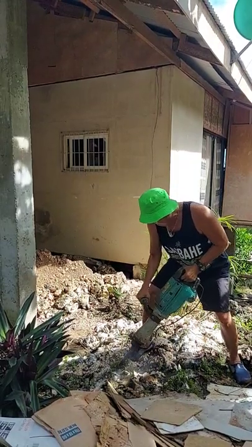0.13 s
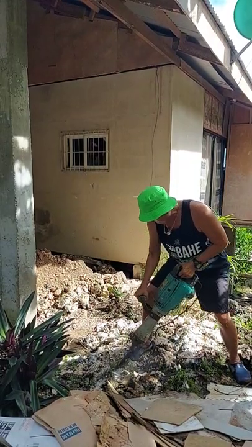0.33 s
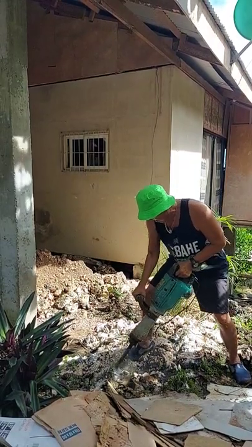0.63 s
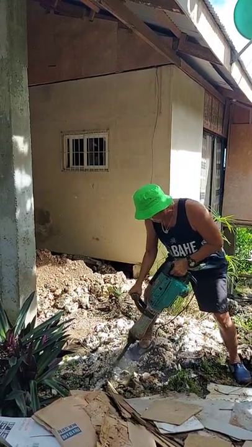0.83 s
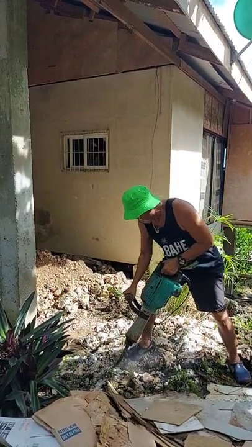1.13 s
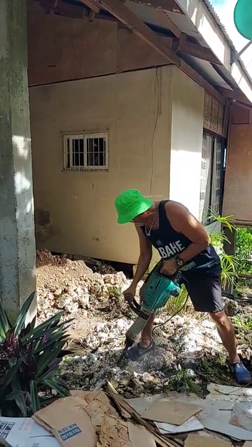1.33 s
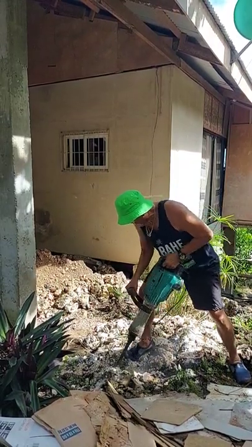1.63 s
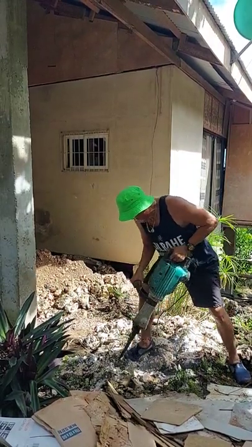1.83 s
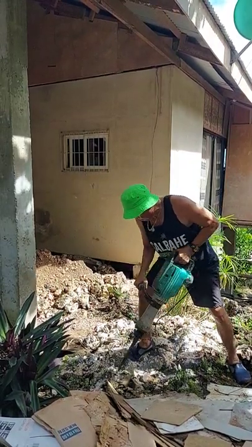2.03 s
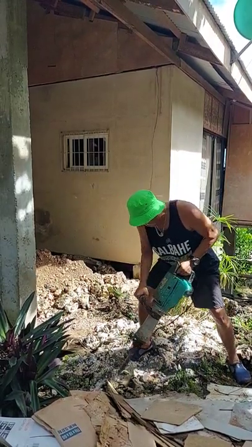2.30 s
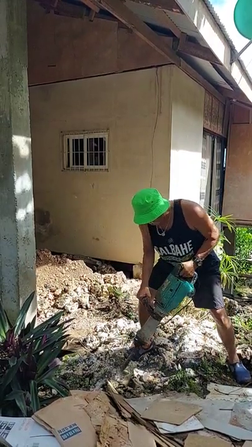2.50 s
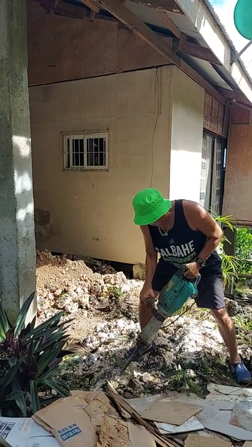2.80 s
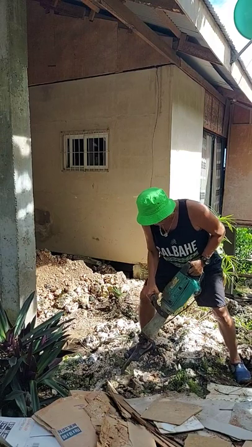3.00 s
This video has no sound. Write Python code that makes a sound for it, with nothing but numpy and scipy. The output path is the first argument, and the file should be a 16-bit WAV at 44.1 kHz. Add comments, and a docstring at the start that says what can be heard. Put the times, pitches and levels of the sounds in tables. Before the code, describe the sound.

Demolition hammer chipping stone outdoors, fast ringing clatter that dulls, bites again, and winds down.

```python
"""An electric demolition hammer chips rocky ground beside a house wall, about 17 blows a second.
First the motor whirrs, as coloured noise with a hum, and the loose chisel knocks in its holder.
Then each blow cracks on the rock (noise bursts), rings the steel chisel (decaying modes), thuds into
the soil (a sine of sagging pitch) and booms in the housing, while the house wall sends back echoes.
The blows soften as the chisel sinks in, bite again, then slow and stop; the motor runs down to a dull bump."""
import sys
import numpy as np
from scipy import signal
from scipy.io import wavfile

SR = 44100
rng = np.random.default_rng(int(sys.argv[2]) if len(sys.argv) > 2 else 0)


def master(y):
    """Save y as 16-bit WAV."""
    cut = np.clip(np.atleast_2d(y).T, -1, 1)
    pcm = np.round(cut * 32767)  # scale
    wavfile.write(sys.argv[1], SR, pcm.astype(np.int16))


N = 138915
T = np.arange(N) / SR  # time [s]


def amp(db):
    """Level to amplitude ratio: 20 dB is a factor of ten."""
    return 10 ** (np.asarray(db) / 20)


def evened(x):
    """Normalisation to unit root-mean-square amplitude."""
    return x / np.sqrt(np.mean(x ** 2) + 1e-20)


def add(mix, s, sound):
    """Linear superposition: adds a sound into the mix, in place, from time s [s]."""
    part = mix[max(round(s * SR), 0):][:len(sound)]
    part += sound[:len(part)]


def drift(rate_hz):
    """Slow random modulation of unit rms: straight lines between random knots, two per 1 / rate_hz."""
    knots = rng.standard_normal(SR // 2)
    return evened(np.interp(T * rate_hz * 2, np.arange(len(knots)), knots))


def grit(grain):
    """Amplitude-modulated white noise: its power clumps into sub-millisecond grains."""
    clumps = np.exp(grain * np.clip(drift(1200), -2, 2))
    return evened(rng.standard_normal(N) * clumps)


def colour(x, points, size=4096):
    """Minimum-phase filtering: the Hilbert transform of the log gain gives the causal phase; unit power."""
    hz, db = np.transpose(points)
    log_hz = np.log(abs(np.fft.fftfreq(size, 1 / SR)) + 1)
    log_gain = np.log(amp(np.interp(log_hz, np.log(hz), db)))
    response = np.exp(np.conj(signal.hilbert(log_gain)))
    taps = np.fft.ifft(response).real[:size // 2]
    return signal.oaconvolve(x, taps / np.linalg.norm(taps))[:N]


def bursts(times, levels_db, rise, hold, decay):
    """Incoherent addition: envelopes of linear attack, hold and exponential release sum in power."""
    t, power = T[:SR // 10], np.zeros(N)
    shape = np.minimum(t / rise, 1) * np.exp(-np.maximum(t - hold, 0) / decay)
    for s, db in zip(times, levels_db):
        add(power, s, (amp(db) * shape) ** 2)
    return np.sqrt(power)


# how tightly the rock wedges the chisel: (time [s], grip [0-1])
WEDGED = [(0, 0.74), (.45, 0.1), (.85, 0.31), (1.1, 0.37), (1.3, 0.52), (1.68, 0.95), (1.8, .55), (2.3, .4),
          (2.5, 0.4), (2.72, 0.02)]


def wedged(s):
    """Boundary condition of the chisel: grip of the rock at time s, from free (0) to clamped (1)."""
    return np.clip(np.interp(s, *np.transpose(WEDGED)), 0, 1)


def gripped(x, free, tight):
    """Crossfade between the spectra of a free and a clamped body, weighted by the grip."""
    grip = wedged(T)
    return colour(x * (1 - grip), free) + colour(x * grip, tight)


# blows on the rock, levels relative within each part: (time [s], crack level [dB], thud level [dB],
# stone crunch level [dB], chisel ring level [dB], highest modes level [dB], thud reference pitch [Hz])
BLOWS = [(0.2235, -3, -33, -21.5, -11, -24.5, 267), (0.2802, -5, -38, -27, -14, -28, 116),
         (0.3414, -0.5, -24, -20.5, -15, -25, 300), (0.402, -3.5, -20, -26, -12.5, -23, 115),
         (0.4597, -3, -40, -16.5, -20.5, -27, 300), (0.5171, -6, -26, -29.5, -19.5, -28, 70.0),
         (0.5788, -3, -27.5, -24.5, -16, -22, 132), (0.6378, -1, -31, -20, -15, -25.5, 108),
         (0.6968, -5, -23, -23.5, -15, -25, 307), (0.7552, -3.5, -48, -25.5, -15.5, -36, 116),
         (0.816, -5, -22, -19.5, -14, -25.5, 73), (0.8752, -6, -31.5, -22, -13, -25, 101),
         (0.9347, -1.5, -48, -27.5, -14.5, -34, 124), (0.995, -5.5, -58, -24.5, -15.5, -28, 96.9),
         (1.0555, -2, -51, -30.5, -20, -33, 121), (1.1109, -4.5, -51, -35, -22, -28, 121),
         (1.1704, -5, -42, -27, -25, -32, 118), (1.2283, -5.5, -29, -22.5, -15, -26, 132),
         (1.287, -11.5, -39, -28.5, -20, -25, 116), (1.3489, -6.5, -46, -33, -25.5, -26.5, 125),
         (1.4092, -7, -38, -44, -22, -30, 116), (1.4688, -8.5, -37, -30, -20, -30, 131),
         (1.5305, -10, -43, -26, -18.5, -27.5, 114), (1.5882, -8, -37.5, -31, -20.5, -32, 105),
         (1.6492, -13, -42, -34, -38, -44, 124), (1.698, -10, -40.5, -27.5, -52, -42, 300),
         (1.7687, -16, -38, -35, -36, -40, 320), (1.8284, -13, -43, -33, -34, -42, 302),
         (1.8886, -16, -44, -33, -45, -49, 318), (1.949, -18, -44, -30.5, -43, -42, 299),
         (2.0095, -14, -39.5, -33, -31, -39, 336), (2.0705, -18, -38.5, -32, -31, -38, 320),
         (2.1304, -22, -59, -30, -43, -37, 75.4), (2.1911, -14, -47, -26.5, -27, -29.5, 80.7),
         (2.2506, -14.5, -35, -27.5, -37, -30, 350), (2.37, -6.5, -24.5, -20, -17.5, -25.5, 70.5),
         (2.4281, -4.5, -27, -20.5, -16, -21, 237), (2.486, -5, -26.5, -20, -16.5, -22.5, 137),
         (2.5561, -3.5, -32, -20.5, -15.5, -24, 266), (2.6345, -2.5, -42, -22, -20, -24.5, 295),
         (2.7308, -7.5, -40, -27.5, -14, -24, 59.2), (2.8417, -8, -32, -28.5, -15, -25.5, 64.6)]
# spectra of the crack, chisel free and wedged: (frequency [Hz], relative density [dB])
CRACK_FREE = [(100, -30), (1200, -34), (2400, 1), (3200, 0), (4500, 1), (5400, 6), (6500, -8), (8200, 3.5),
              (9400, -12.5), (10600, -14.5), (12000, 1.5), (14000, -6.5), (16000, -3.5)]
CRACK_WEDGED = [(100, -49), (1200, -4.5), (2400, 2), (3150, 9.5), (3650, 0), (4200, 5), (5400, -2),
                (6800, -1.5), (8200, 4), (9400, -18), (10600, -11), (12400, -15.5), (14000, -8),
                (16000, -11)]
# spectrum of the stone crunch: (frequency [Hz], relative density [dB])
CRUNCH = [(100, -21), (350, -6.5), (620, 1), (920, -3), (1300, 0.5), (1750, 1), (2300, -7), (4000, -19.5),
          (16000, -60)]
CRACK_OFFSET_DB, CRACK_HOLD_S, CRACK_DECAY_S, CRACK_GRAIN = -8.5, 0.0017, 0.0017, 0.17
CRUNCH_OFFSET_DB, CRUNCH_HOLD_S, CRUNCH_DECAY_S = 1.5, 0.002, 0.0023


def rock():
    """Impact and fracture: a short broadband force on stone gives a sharp crack and a duller crunch."""
    s, crack_db, _, crunch_db, *_ = np.transpose(BLOWS)
    crack_level = bursts(s, crack_db + CRACK_OFFSET_DB, 0.00033, CRACK_HOLD_S, CRACK_DECAY_S)
    crunch_level = bursts(s, crunch_db + CRUNCH_OFFSET_DB, 0.00076, CRUNCH_HOLD_S, CRUNCH_DECAY_S)
    crack = gripped(grit(CRACK_GRAIN) * crack_level, CRACK_FREE, CRACK_WEDGED)
    return crack + colour(grit(0.27) * crunch_level, CRUNCH)


# the loose chisel knocks in its holder: (time [s], knock level [dB], ring level [dB])
KNOCKS = [(.023, -30, -52), (.046, -28.5, -50), (.080, -32, -51), (.106, -28.5, -48), (.142, -32.5, -53),
          (.255, -28, -20), (.303, -35, -25), (.381, -32, -20), (.414, -28, -18), (.609, -36, -20.5),
          (1.709, -25.5, -43), (2.405, -31, -23), (2.442, -31, -18.5), (2.456, -42, -23), (2.517, -36, -19),
          (2.586, -40, -23.5), (2.61, -34, -23.5), (2.749, -33, -36), (2.864, -28, -22.5),
          (3.016, -40, -66), (3.063, -39.5, -68)]


def strikes():
    """Impulsive excitation of the chisel by blows and knocks: (time [s], ring [dB], highest modes [dB])."""
    blows = [(s, ring_db, high_db) for s, _, _, _, ring_db, high_db, _ in BLOWS]
    knocks = [(s, ring_db, ring_db - 13) for s, _, ring_db in KNOCKS]
    return blows + knocks


# modes of the chisel: (frequency [Hz], relative level when free [dB], 60 dB decay time [s],
# level change when fully wedged [dB])
CHISEL = [(5314, -7, 0.088, -19), (5457, -11.5, 0.24, -27), (7845, -10.5, 0.51, 0), (7870, -13, .12, 4),
          (8030, -10, 0.15, -6), (8570, -17, 0.14, -8), (8255, -6, 0.26, -11), (11570, -0.5, 0.066, 2),
          (11440, 2, 0.11, -9.5), (12630, -11, 0.36, 8), (13600, -17, .14, 2), (14928, -14, .18, -4),
          (15600, -17, .2, -6)]
HIGH_MODES_HZ = 10000  # modes above this follow the level of the highest modes
RING_SPREAD_DB = 0.5  # random spread of each mode at each strike
RING_RATTLE, RING_JITTER_HZ = 0.35, 18.05  # rms depth of level and of frequency modulation


def ring():
    """Modal synthesis: struck resonators rebalanced by chance and grip, and rattled by the holder."""
    s, ring_db, high_db = np.transpose(strikes())
    at, out = np.round(s * SR).astype(int), np.zeros(N, complex)
    chance = rng.standard_normal((len(s), len(CHISEL), 2))
    for k, (hz, db, t60, wedge_db) in enumerate(CHISEL):
        spread, turns = chance[:, k].T
        strike_db = high_db if hz > HIGH_MODES_HZ else ring_db
        level_db = strike_db + db + wedge_db * wedged(s) + RING_SPREAD_DB * spread
        kicks = np.zeros(N, complex)
        kicks[at] = amp(level_db) * np.exp(2j * np.pi * turns)
        # one complex pole turns at the modal frequency and decays by 60 dB in t60
        pole = np.exp((2j * np.pi * hz - np.log(1000) / t60) / SR)
        out += signal.lfilter([1], [1, -pole], kicks)
    jitter = np.exp(2j * np.pi * np.cumsum(RING_JITTER_HZ * drift(90)) / SR)
    return (out * jitter).real * (1 + RING_RATTLE * drift(160))


# spectra of the clang, chisel free and wedged: (frequency [Hz], relative density [dB])
CLANG_FREE = [(1000, -59), (4800, -14.5), (5400, -4.5), (6000, -21), (7300, -31), (7850, 6), (8150, 7.5),
              (8600, -6), (9300, -34), (16000, -36)]
CLANG_WEDGED = [(1000, -18), (2700, -30.5), (3150, -6), (3600, -24), (6700, -10.5), (7400, -5), (8000, 6),
                (8500, -2.5), (9300, -21), (16000, -52)]
# spectra of the shimmer, chisel free and wedged: (frequency [Hz], relative density [dB])
SHIMMER_FREE = [(9500, -50), (11000, -4), (11500, 4), (12000, -17), (12550, -20), (13900, -12), (15200, -1)]
SHIMMER_WEDGED = [(9500, -25), (11000, -33), (12000, -8), (12500, 11), (12900, 2), (13300, -16), (15200, 2)]
CLANG_OFFSET_DB, CLANG_HOLD_S, CLANG_DECAY_S = -3, 0.0013, 0.012
SHIMMER_OFFSET_DB, SHIMMER_WEDGED_DB, SHIMMER_DECAY_S = -2, 9, 0.012  # second: added at full grip


def clang():
    """High modal density: short-lived modes of chisel and holder merge into noise, with a shimmer on top."""
    s, ring_db, high_db = np.transpose(strikes())
    clang_level = bursts(s, ring_db + CLANG_OFFSET_DB, 0.00067, CLANG_HOLD_S, CLANG_DECAY_S)
    shimmer_db = high_db + SHIMMER_OFFSET_DB + SHIMMER_WEDGED_DB * wedged(s)
    shimmer_level = bursts(s, shimmer_db, 0.0005, CLANG_HOLD_S, SHIMMER_DECAY_S)
    main = gripped(grit(0.062) * clang_level, CLANG_FREE, CLANG_WEDGED)
    return main + gripped(grit(0.11) * shimmer_level, SHIMMER_FREE, SHIMMER_WEDGED)


# spectrum of the soil rumble: (frequency [Hz], relative density [dB])
SOIL = [(20, -19), (45, 2), (80, -7), (135, -4), (210, 0.5), (310, 0.5), (450, -1.5), (600, -19),
        (900, -61), (4000, -67)]
SOIL_OFFSET_DB, SOIL_RISE_S, SOIL_DECAY_S = 4.5, 0.0017, 0.0066
THUD_OFFSET_DB, THUD_RISE_S, THUD_DECAY_S = 8, 0.0019, 0.016
THUD_START, THUD_END, THUD_SAG_S = 1.29, 0.455, 0.0084  # pitch ratios to the reference; time constant


def ground():
    """Damped oscillation: each push on the soil gives a few cycles of sagging pitch and a short rumble."""
    t, thuds = T[:SR // 10], np.zeros(N)
    sag = THUD_END + (THUD_START - THUD_END) * np.exp(-t / THUD_SAG_S)
    u = t / THUD_RISE_S
    shape = 2 * u / (1 + u ** 2) * np.exp(-t / THUD_DECAY_S)
    for s, _, db, *_, hz in BLOWS:
        wave = np.sin(2 * np.pi * np.cumsum(hz * sag) / SR)
        add(thuds, s, amp(db + THUD_OFFSET_DB) * shape * wave)
    s, _, thud_db, *_ = np.transpose(BLOWS)
    rumble_level = bursts(s, thud_db + SOIL_OFFSET_DB, SOIL_RISE_S, SOIL_RISE_S, SOIL_DECAY_S)
    return thuds + colour(grit(0.17) * rumble_level, SOIL)


# modes of the tool body: (mean frequency [Hz], relative level [dB], 60 dB decay time [s])
HOUSING = [(84, -40, 0.11), (131.5, -32.5, 0.069), (300, -43, 0.11), (607.3, -36, .08),
           (1692, -37.5, 0.048)]
RECOIL_RISE_S, RECOIL_FULL_DB = 0.0083, -6.5  # weaker cracks than this shake the housing less


def housing():
    """Recoil by reaction: every blow sets off brief body modes, slightly detuned by chance."""
    hz, db, t60 = np.transpose(HOUSING)[:, :, None]
    t, out = T[:SR // 8], np.zeros(N)
    fade = amp(db - 60 * t / t60) * np.minimum(t / RECOIL_RISE_S, 1)
    for s, crack_db, *_ in BLOWS:
        detune, phase = rng.standard_normal((2, len(hz), 1))
        waves = np.sin(2 * np.pi * (hz * (1 + 0.034 * detune) * t + phase))
        recoil_db = 7 + min(crack_db - RECOIL_FULL_DB, 0)
        add(out, s, amp(recoil_db) * (fade * waves).sum(0))
    return out


# level of the motor as it works and runs down: (time [s], level [dB])
MOTOR = [(0, -36), (.2, -34.5), (.46, -34.5), (.98, -32), (1.4, -31.5), (1.82, -32), (2.05, -32),
         (2.33, -28.5), (2.5, -35), (2.7, -35.5), (2.82, -39.5), (3.0, -46), (3.08, -45), (3.15, -52)]
# spectrum shared by whirr and knocks: (frequency [Hz], relative density [dB])
WHIRR = [(20, -49), (50, -0.5), (80, 5), (130, -3), (195, -19.5), (300, 5.5), (430, -6), (620, 2.5),
         (880, -7.5), (1500, 0), (1900, -2.5), (2200, 0), (2750, 0.5), (3200, 1.5), (4200, 2), (5500, -4),
         (6800, -7), (8400, -3), (9300, -18), (11500, -9.5), (16000, -11.5)]
CRANK_DEPTH, CRANK_LAG = 0.075, 0.83  # surge as a share of amplitude; lag in turns
FLUTTER_DB, WHIRR_GRAIN = 1.6, 0.31  # rms flutter; clumping of the noise
HUM_HZ, HUM_DB, HUM_WAVER = 297, -22, 0.019  # mean pitch; level relative to MOTOR; rms share of pitch


def motor():
    """Modulated noise and tone: fan and gears whirr and surge per crank turn; holder knocks, armature hums."""
    level = amp(np.interp(T, *np.transpose(MOTOR)))
    # one crank turn per blow, between the first blow and the last
    crank_turns = np.interp(T, [row[0] for row in BLOWS], np.arange(len(BLOWS)))
    surge = 1 + CRANK_DEPTH * np.cos(2 * np.pi * (crank_turns - CRANK_LAG))
    flutter = amp(FLUTTER_DB * drift(100))
    whirr = level * surge * flutter * grit(WHIRR_GRAIN)
    s, knock_db, _ = np.transpose(KNOCKS)
    knocks = grit(0.23) * bursts(s, knock_db, 0.00048, 0.00077, 0.0085)
    hum_hz = HUM_HZ * (1 + HUM_WAVER * drift(9.9))
    hum = np.sin(2 * np.pi * np.cumsum(hum_hz) / SR)
    return colour(whirr + knocks, WHIRR) + level * amp(HUM_DB) * hum


# spectrum of the closing bump: (frequency [Hz], relative density [dB])
BUMP = [(25, -12), (70, -1), (110, -5), (200, -27), (1000, -54)]
BUMP_S, BUMP_DB, BUMP_RISE_S, BUMP_DECAY_S = 3.04, -42.5, 0.015, 0.025


def bump():
    """Soft impact: a slow rise leaves only low frequencies as the tool comes to rest after the last blow."""
    level = bursts([BUMP_S], [BUMP_DB], BUMP_RISE_S, BUMP_DECAY_S, BUMP_DECAY_S)
    return colour(rng.standard_normal(N) * level, BUMP)


# reflections from ground, wall and eaves: (delay [s], level relative to direct sound [dB])
ECHOES = [(.0032, -8.5), (.0098, -12), (.0135, -25)]
YARD_DB, YARD_T60_S = -11, 0.26  # tail level relative to direct sound; its 60 dB decay time


def yard(x):
    """Early reflection and reverberation: convolution with scattered echoes and a short diffuse tail."""
    t = T[:SR // 3]
    tail = rng.standard_normal(len(t)) * amp(-60 * t / YARD_T60_S) * np.minimum(t / 0.019, 1)
    taps = amp(YARD_DB) * tail / np.linalg.norm(tail)
    for delay, db in ECHOES:
        # a rough surface smears each echo over about a millisecond
        scatter = rng.standard_normal(SR // 100) * np.exp(-t[:SR // 100] / 0.0012)
        add(taps, delay, amp(db) * scatter / np.linalg.norm(scatter))
    return x + signal.oaconvolve(x, taps)[:N]


def scene():
    """Superposition of all sources; only the cracks, rings and clangs excite the yard."""
    bright = yard(rock() + ring() + clang())
    return (bright + ground() + housing() + motor() + bump())[None]


LOW_CUT_HZ, CEILING, EDGE_HZ = 27, 0.73, 15800  # high-pass; saturation amplitude; low-pass


def record(dry):
    """Microphone response: high-pass, saturation that rounds off the hardest peaks, then a band limit."""
    high_pass = signal.butter(2, LOW_CUT_HZ, "high", fs=SR, output="sos")
    x = signal.sosfilt(high_pass, dry)
    rounded = x / (1 + (x / CEILING) ** 4) ** (1 / 4)
    low_pass = signal.firwin(511, EDGE_HZ, window=("kaiser", 9), fs=SR)
    return signal.oaconvolve(rounded, low_pass[None], "same")


dry = scene()
out = record(dry)
master(out)
```